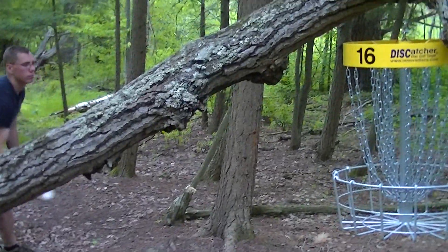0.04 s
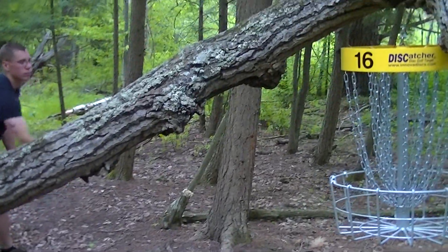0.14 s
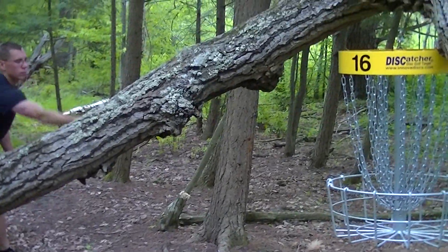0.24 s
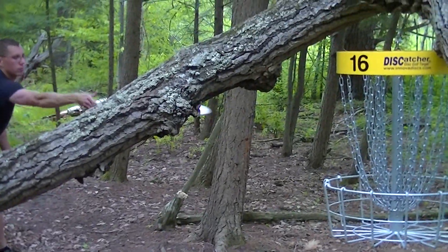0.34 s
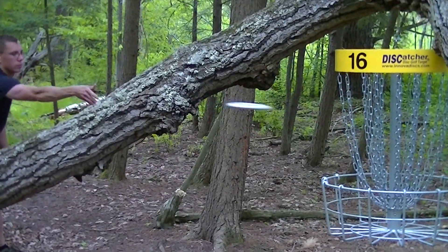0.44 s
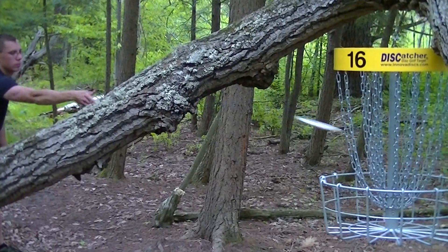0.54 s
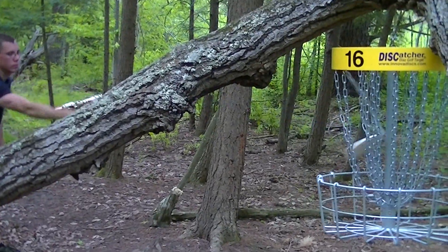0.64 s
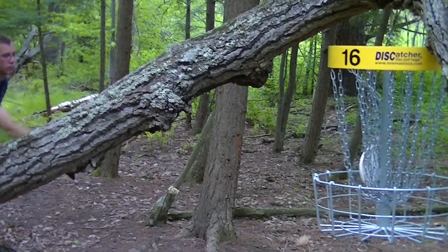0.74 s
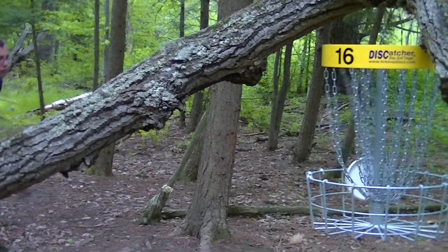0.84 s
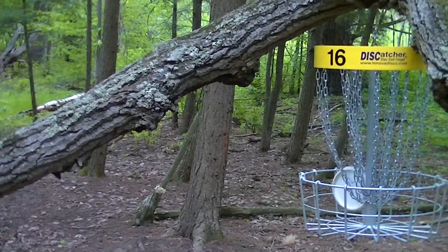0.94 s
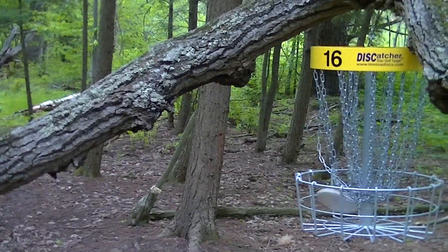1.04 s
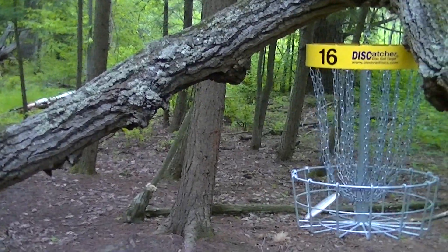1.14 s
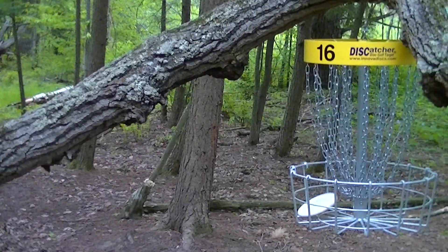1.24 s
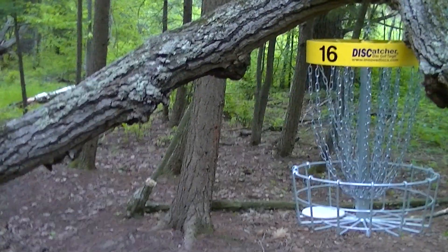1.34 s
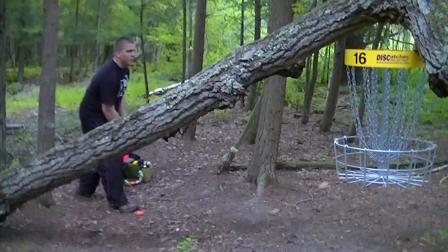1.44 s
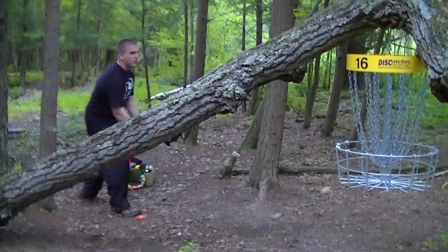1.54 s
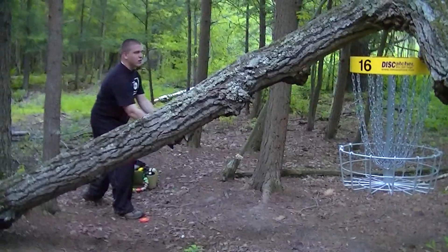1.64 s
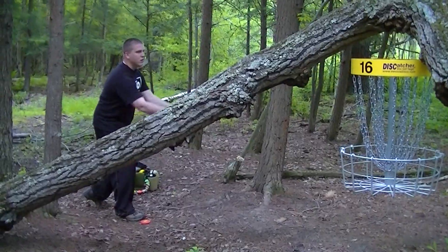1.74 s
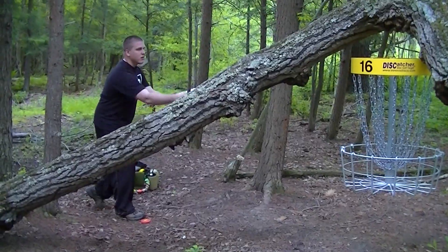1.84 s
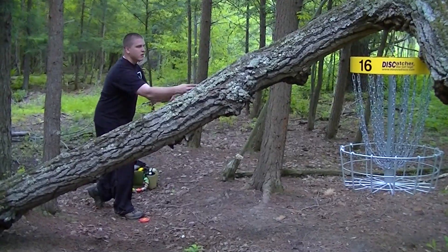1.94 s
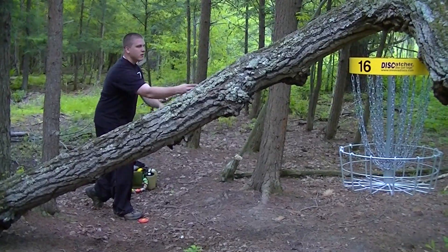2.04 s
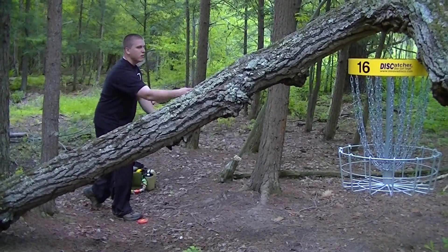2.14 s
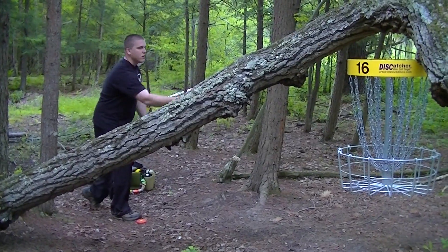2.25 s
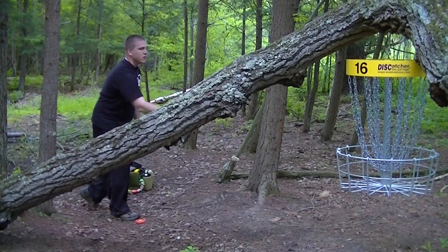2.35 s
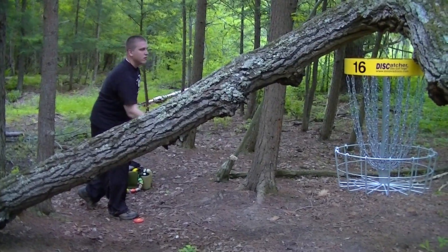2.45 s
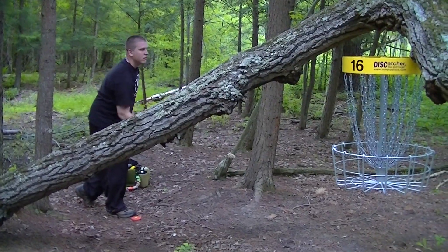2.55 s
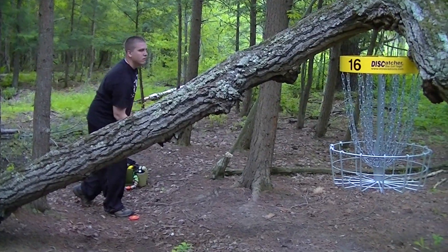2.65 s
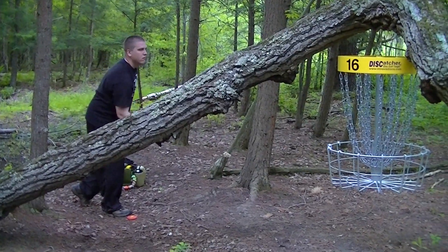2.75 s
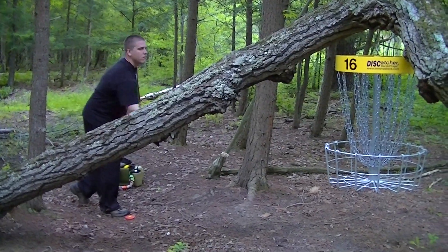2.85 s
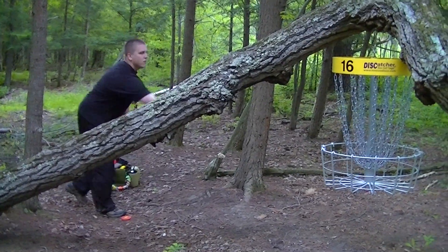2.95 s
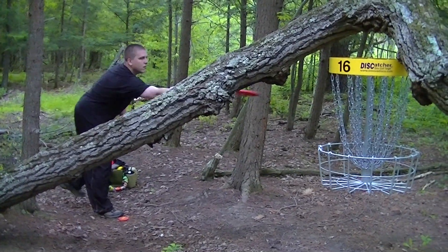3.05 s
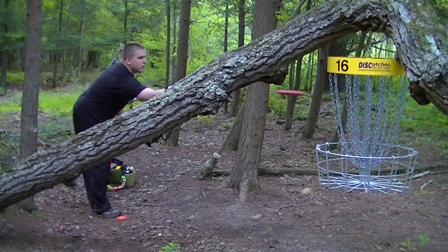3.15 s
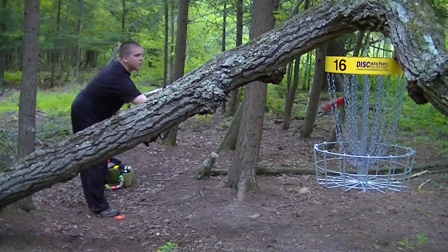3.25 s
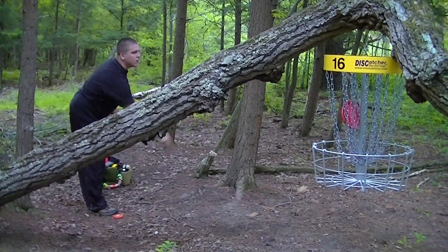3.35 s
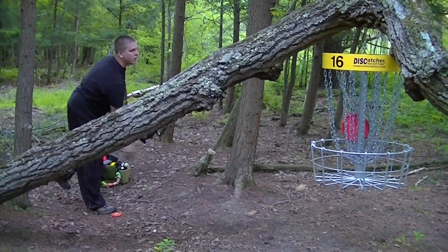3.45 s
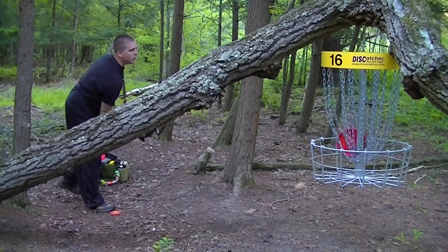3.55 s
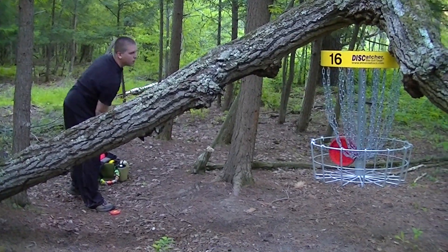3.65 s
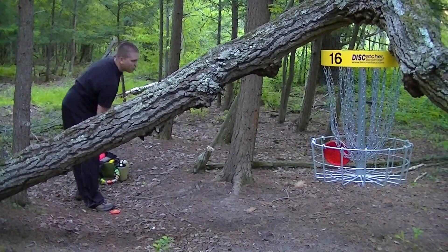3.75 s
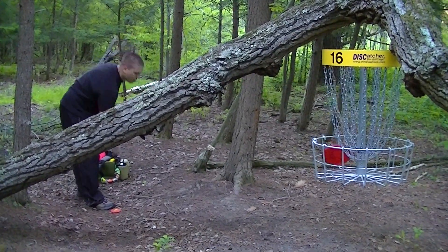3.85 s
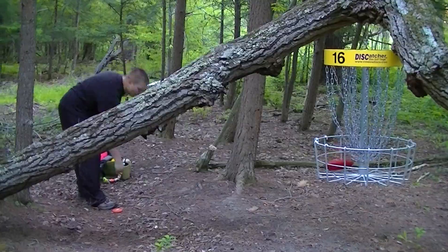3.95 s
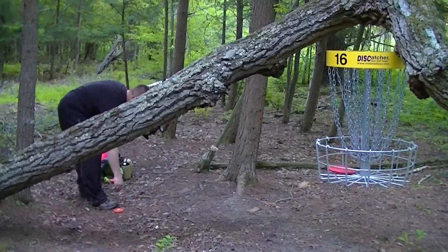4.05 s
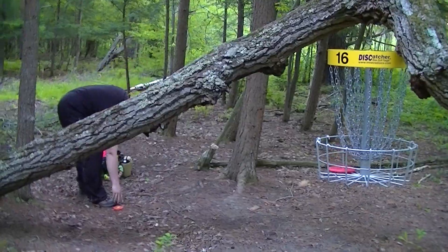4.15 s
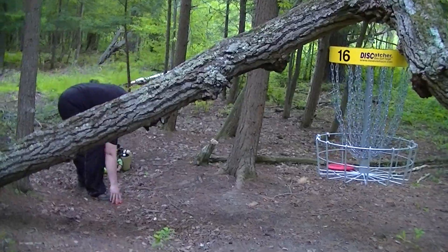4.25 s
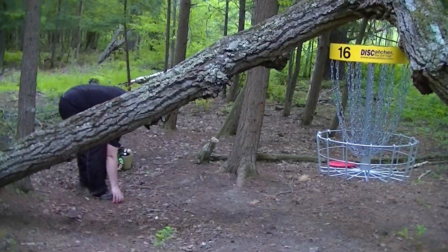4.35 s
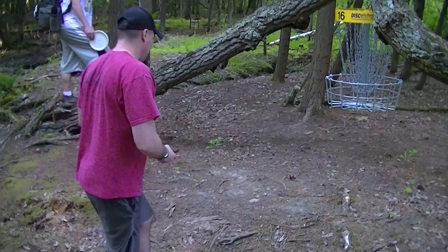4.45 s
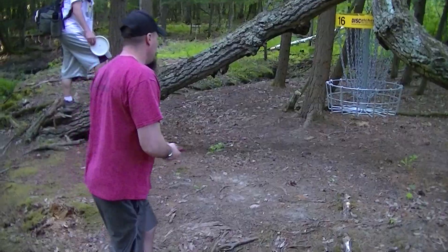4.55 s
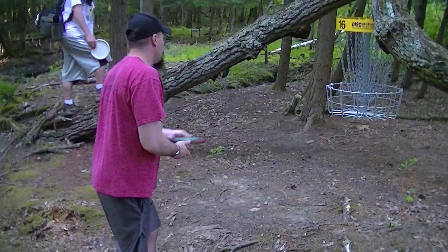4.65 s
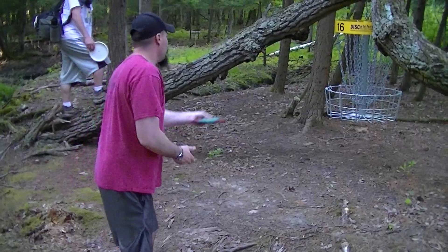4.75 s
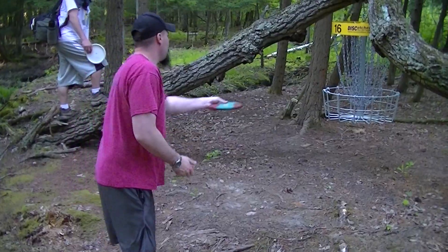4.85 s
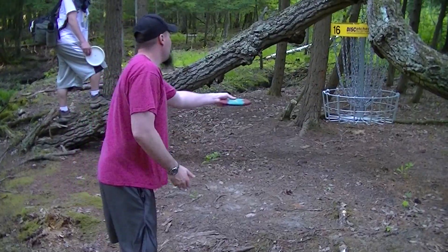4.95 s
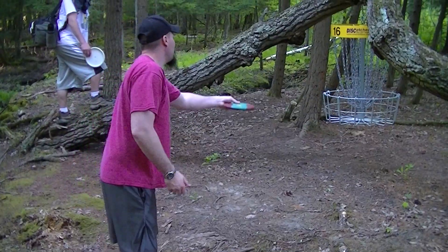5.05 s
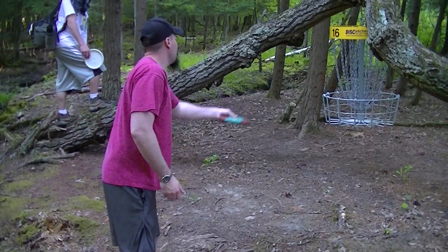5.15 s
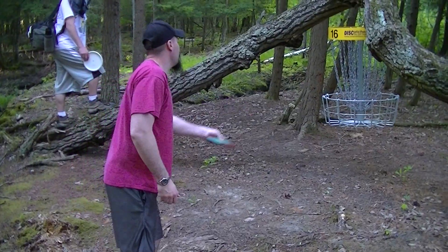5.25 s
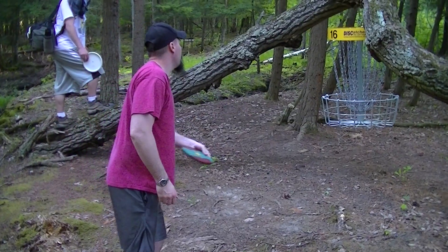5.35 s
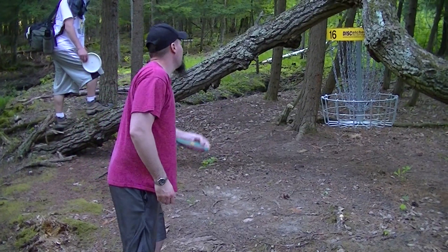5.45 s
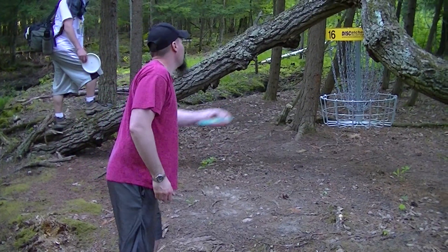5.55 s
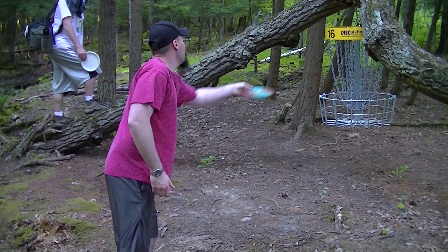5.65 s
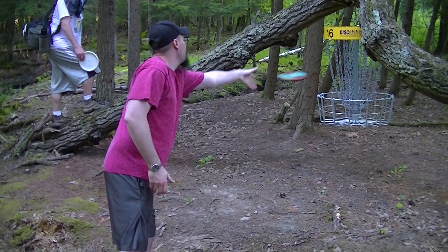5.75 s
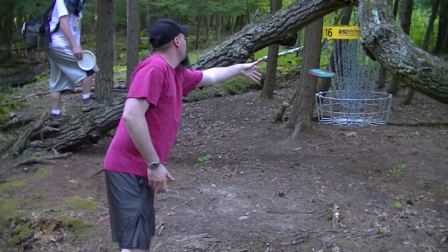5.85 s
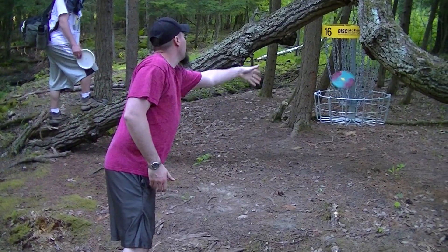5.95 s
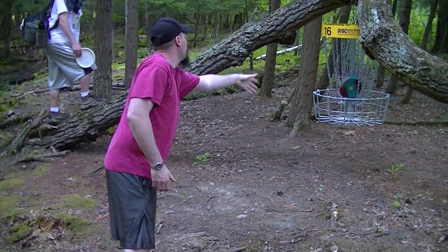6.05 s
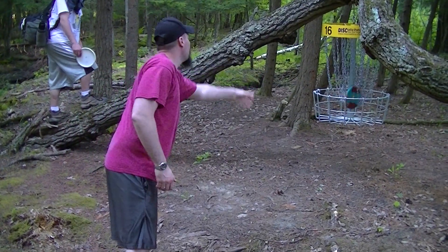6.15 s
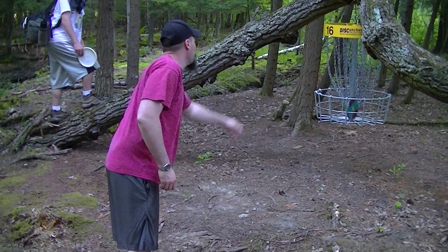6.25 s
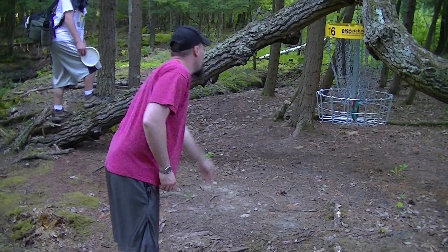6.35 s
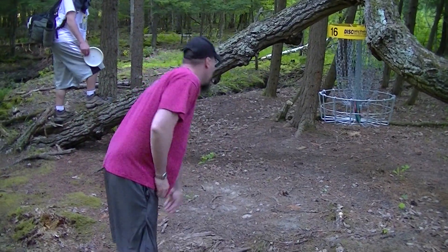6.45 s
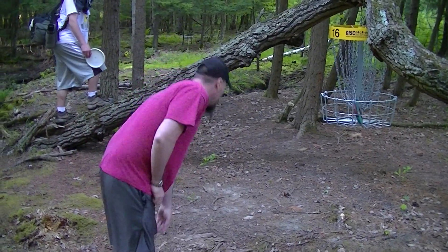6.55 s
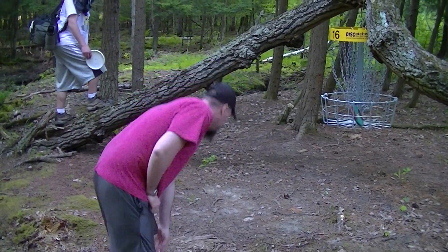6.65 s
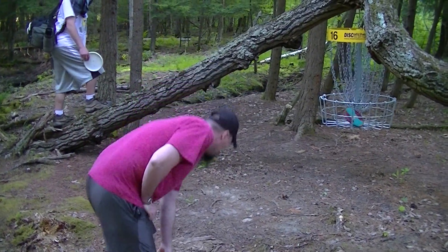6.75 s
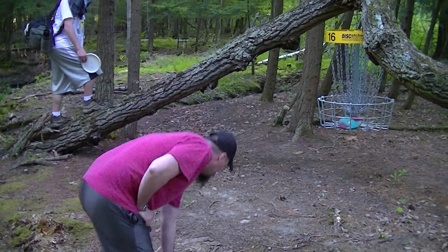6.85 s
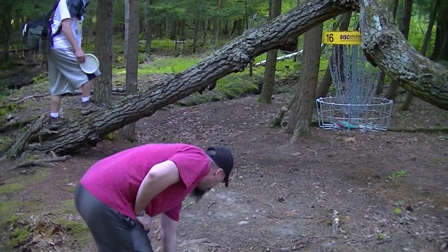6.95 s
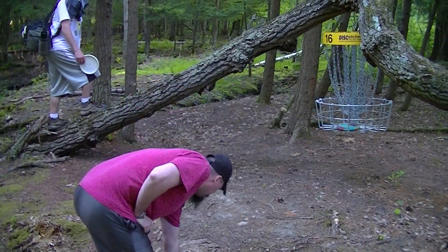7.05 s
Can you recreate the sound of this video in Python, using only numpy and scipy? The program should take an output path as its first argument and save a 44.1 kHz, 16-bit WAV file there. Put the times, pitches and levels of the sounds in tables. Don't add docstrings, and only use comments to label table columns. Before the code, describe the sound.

Three disc throws into a chain basket outdoors among trees. Each impact is a sudden bright burst of clashing links, dense metallic rattle and dull plastic knocks, thinning into single high clinks. Two abrupt scene changes chop the ringing short. Between throws, twigs snap, dry leaves tick, feet thud softly and cloth swishes, with faint lens-motor ticking. A small handheld camera hears it close and almost mono, over a low, airy forest hum.

```python
import sys
import numpy as np
from scipy import signal
from scipy.fft import rfft, irfft, next_fast_len
from scipy.io import wavfile
from scipy.ndimage import uniform_filter1d

SR = 44100
rng = np.random.default_rng(int(sys.argv[2]) if len(sys.argv) > 2 else 0)


def rack_gain(trim_db):
    fader = np.asarray(trim_db, float)
    return 10 ** (fader / 20)


def transcribe(signal):
    frames = np.atleast_2d(signal).T
    limited = np.clip(frames, -1, 1)
    pcm = np.round(limited * 32767).astype(np.int16)
    wavfile.write(sys.argv[1], SR, pcm)


N = 313065


def rms_one(x):
    return x / np.sqrt(np.mean(x ** 2) + 1e-20)


def at_hz(points, hz):
    point_hz, point_db = np.array(points).T
    return np.interp(np.log(hz), np.log(point_hz), point_db)


def coloured(x, points):
    size = next_fast_len(N)
    hz = np.maximum(np.arange(size // 2 + 1) * SR / size, 1)
    return rms_one(irfft(rfft(x, size) * rack_gain(at_hz(points, hz)), size)[:N])


def band(x, low_hz, high_hz):
    sos = signal.butter(2, [low_hz, min(high_hz, .45 * SR)], "band", fs=SR, output="sos")
    return signal.sosfilt(sos, x)


def ring(clicks, hz, t60):
    r = rack_gain(-60 / (t60 * SR))
    w = 2 * np.pi * hz / SR
    return signal.lfilter([0, np.sin(w)], [1, -2 * r * np.cos(w), r * r], clicks + 1e-18)


def grains(per_s, uneven_db):
    sizes = rack_gain(uneven_db * np.minimum(rng.exponential(1, N), 5)) * rng.choice([-1, 1], N)
    return rms_one(sizes * (rng.random(N) < per_s / SR))


def add(track, s, burst):
    at = round(s * SR)
    track[at:at + len(burst)] += burst[:N - at]


def dying(t60):
    return rack_gain(-60 * np.arange(int(t60 * SR) + 2) / (t60 * SR))


def snap(hz, width, t60, level_db, solid=0):
    fall = dying(t60)
    burst = rng.standard_normal(9000)[:len(fall)] * fall[:9000]
    burst = np.r_[solid, burst, np.zeros(200)]
    burst = band(burst, hz / width, hz * width)
    burst = band(burst, hz / width / 1.3, hz * width * 1.3)
    return rack_gain(level_db) * burst / np.abs(burst).max()


CUTS_S = [1.44, 4.447]
# hum_db, hum_fall_db_per_s, bright_swish_db, dull_swish_db, settling_s
VIEWS = [
    (-50, 4, -63, -61.5, 0.7),
    (-54, -2, -52, -46, 2.27),
    (-54, 0.5, -51, -50.5, 0.55),
]


def by_view():
    t, starts = np.arange(N) / SR, np.r_[0, CUTS_S]
    view = np.searchsorted(starts, t, "right") - 1
    return t - starts[view], *np.array(VIEWS)[view].T


# pitch_hz, level_db per Hz
WOOD_COLOUR = [(12, -33.5), (20, 3.5), (81, 2), (520, 7), (897, 3), (2500, -4.5), (4300, -5),
               (16000, -22.5)]
# pitch_hz, likeness 0 to 1
LIKENESS = [(25, .15), (60, .45), (125, 0.58), (300, 0.86), (1000, 0.85), (16000, 0.7)]


def wood():
    size = next_fast_len(N)
    hz = np.maximum(np.arange(size // 2 + 1) * SR / size, 1)
    alike = np.clip(at_hz(LIKENESS, hz), 0, 1)
    mid, side = (coloured(rng.standard_normal(N), WOOD_COLOUR) for _ in range(2))
    side = irfft(rfft(side, size) * np.sqrt((1 - alike) / (1 + alike)), size)[:N]
    since, hum_db, fall_db_per_s, *_ = by_view()
    hum = rack_gain(np.maximum(hum_db - fall_db_per_s * since, -57))
    return hum * np.array([mid + side, mid - side])


# pitch_hz, level_db
CLOTH_COLOUR = [(1500, -24.5), (2500, -6.5), (5000, 0), (8000, 7), (11000, 1.5), (13500, -2.5),
                (16000, -10)]
# start_s, peak_s, end_s, bright_db, dull_db
SWEEPS = [(1.643, 1.826, 2.05, -37.5, -73), (2.427, 2.443, 2.54, -48, -41.5),
          (4.5, 4.578, 4.64, -38.5, -35), (4.957, 4.95, 5.32, -57.5, -83), (5.455, 5.476, 5.54, -55.5, -48),
          (5.566, 5.625, 5.9, -56, -77)]


def swish():
    since, _, _, bright_db, dull_db, settle_s = by_view()
    left = np.clip(1 - since / settle_s, 0, 1)
    rest_bright_db, rest_dull_db = -65.5, -64
    bright = rack_gain(rest_bright_db + left * (bright_db - rest_bright_db))
    dull = rack_gain(rest_dull_db + left * (dull_db - rest_dull_db))
    for start, peak, end, bright_db, dull_db in SWEEPS:
        phase = np.interp(np.arange(N) / SR, [start, peak, end], [0, np.pi / 2, np.pi])
        swell = np.sin(phase) ** 3.3
        bright = bright + rack_gain(bright_db) * swell
        dull = dull + rack_gain(dull_db) * swell
    cloth = coloured(grains(16000, uneven_db=4.5), CLOTH_COLOUR)
    litter = rms_one(band(grains(6200, uneven_db=5.0), 830, 3740))
    return rack_gain(1.0) * bright * cloth + rack_gain(-8.5) * dull * litter


# start_s, peak_db, pitch_hz
TWIGS = [(0.1652, -30.5, 1800), (0.4735, -29.5, 4700), (1.4945, -18, 1660), (1.514, -20.5, 8100),
         (1.584, -7.5, 2870), (1.6082, -18, 1740), (1.66, -25.5, 2540), (1.99, -19.5, 10400),
         (2.0377, -0.5, 1520), (1.558, -26, 6050), (1.678, -27, 2530), (4.7207, -27, 6560),
         (5.2792, -34.5, 8000), (2.2979, -21.5, 2000), (2.4443, -23.5, 8010), (3.049, -20, 1470),
         (4.481, -20, 8380), (4.495, -20.5, 2220), (4.6636, -29.5, 2550), (5.3602, -23, 4430),
         (5.471, -24.5, 2200), (5.5083, -26, 3830), (5.7894, -23, 3070)]
# start_s, peak_db
LEAVES = [(2.045, -24), (2.0785, -23), (2.1257, -27), (2.28, -31), (2.375, -26), (2.419, -27), (2.571, -35),
          (4.632, -36), (4.702, -33), (4.778, -36), (4.965, -37), (5.091, -36.5), (5.045, -31),
          (5.2413, -32.5), (5.406, -38.5), (5.6191, -34), (5.7648, -44.5), (5.85, -34)]
# start_s, peak_db, pitch_hz
STEPS = [(1.494, -39.5, 760), (1.607, -41, 880), (1.942, -45.5, 980), (2.036, -33.5, 534),
         (2.2, -49.5, 207), (2.297, -43, 840), (2.455, -42.5, 630), (3.049, -50, 1040), (4.576, -41.5, 284),
         (4.649, -41.5, 295), (2.038, -22.5, 1620)]


def underfoot():
    out = np.zeros(N)
    for s, level_db, hz in TWIGS:
        add(out, s, snap(hz, width=1.63, t60=0.024, level_db=level_db - 7.5, solid=10.8))
        add(out, s, snap(4500, width=2.3, t60=0.013, level_db=level_db - 12.0))
    for s, level_db in LEAVES:
        leaf_hz = 9900 + 142 * (level_db + 15.0)
        add(out, s, snap(leaf_hz, width=1.32, t60=0.0028, level_db=level_db - 2.5))
    for s, level_db, hz in STEPS:
        add(out, s, snap(hz, width=1.15, t60=0.1, level_db=level_db - 0.5))
        add(out, s, snap(330, width=1.74, t60=0.035, level_db=level_db + 3.5))
    return out


def trunks(x, level_db, t60):
    length = int(.6 * SR)
    fall = dying(t60 + 0.8)[:length] ** ((t60 + 0.5) / t60)
    tail = band(rng.standard_normal(length) * fall, 250, 9000)
    tail = np.r_[np.zeros(500), tail]
    return rack_gain(level_db) * signal.fftconvolve(x, tail / np.sqrt(np.sum(tail ** 2)))[:N]


# time_s, level_db
SWING = [
    [(.62, -24.5), (.8, -13), (.95, -23.5), (1.12, -29), (1.22, -21.5), (1.3, -37.5), (1.44, -30.5)],
    [(3.27, -16.5), (3.46, -15), (3.7, -22), (3.85, -21.5), (3.93, -33), (4.1, -33), (4.3, -30.5),
     (4.44, -43.5)],
    [(5.98, -17.5), (6.15, -22.5), (6.27, -27), (6.45, -25), (6.6, -39.5), (6.72, -43), (6.92, -54.5),
     (7.09, -39.5)],
]


def gains_in_time(level_db, share):
    rows = [[(throw[0][0] - .004, -99), *throw, (throw[-1][0] + .019, -99)] for throw in SWING]
    swing_db = np.interp(np.arange(N) / SR, *np.vstack(rows).T)
    return rack_gain(level_db + share * (swing_db + 20)) * (swing_db > -70)


def links(families, jangle, clash_s, clash_db, jangle_db, clash_lift_db, damping, run_s, count,
          scatter=1, touches=3):
    out = np.zeros(N)
    few = np.clip((clash_db - clash_db.max()) / 35 * scatter + 1, .3, 1)[:, None]
    for hz, spread_hz, level_db, t60 in families:
        favour_db = scatter * rng.normal(0, 2.92, (len(clash_s), 1))
        for offset in np.linspace(-1.3, 1.3, count) + rng.normal(0, 0.13, count):
            at = rng.integers(0, N, 800)
            small_db = jangle_db + 2.84 * np.minimum(rng.exponential(1, 800), 4)
            small = jangle[at] * rack_gain(small_db) * rng.choice([-1, 1], 800)
            late = run_s * rng.exponential(1, (len(clash_s), touches))
            late[:, 0] *= .15
            share_db = rng.normal(0, 5.27, late.shape)
            mean_power = np.mean(rack_gain(share_db) ** 2, axis=1, keepdims=True)
            share_db -= (1 - scatter) * 10 * np.log10(mean_power)
            hard = rack_gain(clash_db[:, None] + clash_lift_db + share_db + favour_db)
            hard *= rng.choice([-1, 1], late.shape)
            hard *= (rng.random((len(clash_s), 1)) < few) / np.sqrt(few)
            when = np.minimum(((clash_s[:, None] + late) * SR).astype(int), N - 1)
            clicks = np.bincount(np.r_[at, when.ravel()], np.r_[small, hard.ravel()], N)
            link_gain = rack_gain(level_db - 1.74 * offset ** 2)
            out += link_gain * ring(clicks, hz + offset * spread_hz, t60 * damping)
    return out


# start_s, ring_peak_db, rattle_db
CLASH_1 = [(0.6128, -2, -5), (0.6508, 1, -14), (0.68, 0.5, -31), (0.709, -1, -13.5), (0.736, -3, -36),
           (0.7873, -1, -33), (0.827, -12, -23), (0.8673, -1.5, -14.5), (0.9, -2.5, -33), (1.0197, -4, -21),
           (1.06, -11, -14), (1.149, -4, -30), (1.1787, -7.5, -25.5), (1.3267, -19, -48), (1.348, -16, -37)]
CLASH_2 = [(3.264, 2, -6), (3.3109, 1, -15), (3.333, 5.5, -35), (3.384, 2.5, -13.5), (3.4923, -7, -20),
           (3.526, -6, -40), (3.5604, -9, -15.5), (3.5878, -6, -24), (3.6366, -2, -17), (3.671, -2, -13.5),
           (3.724, -9, -27), (3.7559, -13, -17), (3.822, -24, -20), (3.9513, -12.5, -32), (3.98, -5.5, -30),
           (4.0026, -18, -47), (4.061, -32, -27.5), (4.1266, -18, -60), (4.1778, -18, -31.5),
           (4.2062, -25, -64), (4.277, -20, -60), (4.395, -40, -48), (4.436, -27.5, -35)]
CLASH_3 = [(5.9719, 2, -8.5), (6.0188, -0.5, -14), (6.0498, 3.5, -21), (6.0716, 3.5, -38),
           (6.1112, 0, -19.5), (6.1516, 0, -27), (6.1912, -0.5, -16), (6.331, -28, -22.5),
           (6.3993, -4, -14.5), (6.4665, -9, -20.5), (6.624, -16, -27.5), (6.657, -12.5, -27.5),
           (6.7286, -13, -39), (6.757, -15, -37), (6.8094, -18, -35), (6.8677, -24, -42),
           (6.9475, -20.5, -34.5), (6.968, -20, -31.5), (6.9915, -12.5, -25.5), (7.0808, -17, -45)]
# pitch_hz, spread_hz, level_db, t60_s
HIGH_RING = [(11300, 50, -9, .15), (11660, 55, -4, .22), (11960, 60, 0, .25), (12620, 70, -4, .22),
             (12980, 90, -12, .15), (13400, 60, -15, .18), (13700, 70, -16, .2), (14600, 150, -21, .15)]
# pitch_hz, spread_hz, level_db, t60_s
SIDE_RING = [(5200, 70, -3, .15), (5620, 90, -4, .15), (6490, 40, -1, .18), (7100, 90, -5, .15),
             (7840, 45, 0, .22), (8450, 150, -2, .12), (9960, 40, -3, .2), (10800, 70, -2, .18)]


def clashes():
    s, high_db, side_db = np.transpose(CLASH_1 + CLASH_2 + CLASH_3)
    high = gains_in_time(level_db=-19.0, share=1.0)
    side = gains_in_time(level_db=-27, share=1.0)
    out = links(HIGH_RING, high, s, high_db, jangle_db=-16.5, clash_lift_db=-27.0,
                damping=0.6, run_s=.012, count=8)
    out += links(SIDE_RING, side, s, side_db, jangle_db=-17.5, clash_lift_db=-26.5,
                 damping=0.31, run_s=0.0095, count=5)
    for at, level_db in zip(s, high_db):
        add(out, at, snap(9500, width=1.9, t60=.003, level_db=level_db - 13, solid=8))
    return out


# pitch_hz, level_db
RATTLE_COLOUR = [(1300, -28.5), (2200, -15.5), (4000, -5.5), (5000, 1), (7000, -3.5), (10500, -3.5),
                 (12500, -3), (16000, -14.5)]


def rattle():
    size, knots = next_fast_len(N), np.arange(0, N + SR, int(.045 * SR))
    shares = rng.random((3, len(knots))) ** 2
    out = np.zeros(N)
    for share in shares / np.sqrt(np.sum(shares ** 2, axis=0)):
        fine = rng.standard_normal(size // 2 + 1)
        for _ in range(2):
            fine = uniform_filter1d(fine, int(40.0 * size / SR))
        touched = rfft(grains(4000, uneven_db=2.5), size) * rack_gain(4.5 * rms_one(fine))
        touched = irfft(touched, size)[:N]
        out += np.interp(np.arange(N), knots, share) * rms_one(touched)
    loudness = rack_gain(-5.5) * gains_in_time(level_db=-27, share=1.0)
    swell = dying(.12)
    swell = swell * np.minimum(np.arange(len(swell)) / 90, 1)
    for s, _, rattle_db in CLASH_1 + CLASH_2 + CLASH_3:
        add(loudness, s, rack_gain(rattle_db - 2.0) * swell)
    return loudness * coloured(out, RATTLE_COLOUR)


# start_s, peak_db
POLE_1 = [(0.619, -14), (0.6705, -16), (0.7, -3), (0.741, -7.5), (0.8017, -13), (0.8642, -10), (0.927, -17),
          (1.0204, -23), (1.049, -15), (1.109, -19), (1.1975, -17.5)]
POLE_2 = [(3.265, -17.5), (3.309, -4.5), (3.3856, -12), (3.4098, -6), (3.4799, -5), (3.5481, -9),
          (3.621, -16), (3.654, -9.5), (3.7246, -9.5), (3.8045, -11), (3.9757, -23), (4.056, -21.5),
          (4.1867, -24.5)]
POLE_3 = [(5.975, -10), (6.0139, -11.5), (6.046, -16.5), (6.102, -5.5), (6.1364, -16), (6.1934, -9),
          (6.2935, -22), (6.3346, -22), (6.402, -6), (6.467, -26), (6.6264, -17.5), (6.9896, -17)]
# pitch_hz, spread_hz, level_db, t60_s
LOW_RING = [
    (4516, 9, 0, .22),
    (4610, 45, -5, .1),
    (5150, 420, -10, .06),
]


def pole_hits():
    t, thrown = np.arange(N) / SR, np.array([throw[0][0] for throw in SWING])
    latest = thrown[np.maximum(np.searchsorted(thrown, t) - 1, 0)]
    reach = np.clip((t - latest) / 0.19, .35, 1)
    low = reach * gains_in_time(level_db=-30.5, share=1.33)
    s, pole_db = np.transpose(POLE_1 + POLE_2 + POLE_3)
    clear = links(LOW_RING[:1], low, s, 1.39 * pole_db, jangle_db=-8.0, clash_lift_db=-12.0,
                  damping=0.66, run_s=.004, count=7, scatter=0.14)
    chink = links(LOW_RING[1:], low, s, pole_db, jangle_db=-5.5, clash_lift_db=-12.0,
                  damping=0.74, run_s=.003, count=7, scatter=0.11)
    return band(clear + chink, 4040, 5500)


# start_s, peak_db
BROADSIDE = [(.642, -17), (.787, -38), (1.178, -20.5), (3.266, -29), (3.311, -21), (4.03, -33.5),
             (4.112, -34), (4.148, -36), (4.437, -31.5), (6.019, -19), (6.152, -32), (6.62, -32),
             (6.83, -40.5)]
# pitch_hz, spread_hz, level_db, t60_s
MID_RING = [(9240, 130, 0, .12)]


def broadside_slaps():
    side = gains_in_time(level_db=-27, share=1.0)
    return links(MID_RING, side, *np.transpose(BROADSIDE), jangle_db=-9.0, clash_lift_db=-7.0,
                 damping=0.38, run_s=0.009, count=9)


# start_s, peak_db, pitch_hz
CLINK_1 = [(0.663, -12, 11740), (0.682, -12, 12020), (0.709, -16, 11630), (0.713, -15, 12620),
           (0.738, -17, 12020), (0.808, -16.5, 12660), (0.809, -19, 11900), (0.825, -8, 11840),
           (0.829, -13, 9220), (0.862, -13.5, 7840), (0.866, -11, 11750), (0.885, -14, 12620),
           (0.883, -13, 11400), (0.96, -34, 11970), (0.975, -30.5, 12620), (0.982, -32, 11630),
           (0.981, -28, 11970), (0.982, -13.5, 8970), (1.026, -14, 9100), (1.027, -16, 11670),
           (1.045, -16, 11850), (1.062, -16, 11280), (1.077, -14, 12400), (1.084, -15, 11360),
           (1.137, -17, 12400), (1.157, -24.5, 12020), (1.187, -13, 11570), (1.186, -16, 11840),
           (1.233, -22, 11970), (0.474, -49, 4500), (1.326, -28, 11930), (1.355, -31, 12660),
           (1.363, -22, 11600), (1.376, -20, 11280), (0.925, -23, 7400)]
CLINK_2 = [(3.299, -9, 9100), (3.389, -21, 6500), (3.408, -24, 9220), (3.426, -14.5, 11970),
           (3.499, -11.5, 9200), (3.503, -12, 11900), (3.525, -11, 9200), (3.562, -10, 11930),
           (3.613, -7.5, 9220), (3.685, -12, 11670), (3.705, -21, 11860), (3.737, -23, 13800),
           (3.777, -22.5, 12300), (3.854, -29, 11800), (3.655, -20, 7940), (3.913, -39, 12620),
           (3.966, -22, 12660), (4.006, -28, 12660), (4.007, -17, 11970), (4.062, -27, 12000),
           (3.826, -29, 7150), (4.125, -28, 12000), (4.179, -26, 11400), (4.179, -27, 11640),
           (4.21, -25, 12020), (4.234, -35, 11930), (4.235, -28, 12660), (4.249, -24.5, 9420),
           (4.276, -31, 12500), (4.289, -30, 11670), (4.3, -24.5, 9300), (4.354, -28.5, 9260),
           (4.378, -37, 11900), (4.395, -34, 12200), (4.438, -22, 9250)]
CLINK_3 = [(6.023, -18, 11970), (6.041, -14, 9260), (6.042, -25, 14640), (6.073, -6, 11800),
           (6.125, -10, 11760), (6.152, -11, 11840), (6.224, -19, 12660), (6.25, -20, 11930),
           (6.298, -32, 9200), (6.329, -19.5, 11700), (6.331, -35, 9500), (6.364, -25, 9300),
           (6.409, -13, 9100), (6.419, -12, 11400), (6.433, -13, 11670), (6.472, -16, 11930),
           (6.488, -24, 12580), (6.586, -35, 9300), (6.104, -19, 7790), (6.656, -19.5, 9200),
           (6.666, -20, 12020), (6.758, -16.5, 12000), (6.762, -32, 12600), (6.82, -21.5, 12000),
           (6.824, -30, 12530), (6.868, -24.5, 11550), (6.876, -33, 12660), (6.948, -32, 12580),
           (6.952, -40, 7300), (6.969, -35, 9300), (7, -29, 11670), (7.023, -25, 11930),
           (7.061, -31, 11930), (7.08, -24, 12620)]


def clinks():
    t60_s, rise_s, beat_hz = 0.14, 0.0019, 30
    out = np.zeros(N)
    for s, level_db, hz in CLINK_1 + CLINK_2 + CLINK_3:
        fall = dying(t60_s * (.55 if 8000 < hz < 10000 else 1))
        t = np.arange(len(fall)) / SR
        twin, split, turn = rng.random(3)
        twin_hz = hz + beat_hz * (4 * split - 2)
        pair = np.sin(2 * np.pi * hz * t) + 0.7 * twin * np.sin(2 * np.pi * (twin_hz * t + turn))
        add(out, s - rise_s, rack_gain(level_db + 0.5) * pair * fall * (1 - np.exp(-t / rise_s)))
    return out


def chains():
    tuned = clashes() + pole_hits() + broadside_slaps() + clinks()
    return band(tuned, 1500, 19000) + rattle()


# start_s, peak_db, pitch_hz
KNOCK_1 = [(0.613, -8.5, 1880), (0.662, -12, 1530), (0.703, -15, 1360), (0.753, -19.5, 680),
           (0.79, -17.5, 970), (0.715, -29, 1190), (0.852, -17.5, 1120), (0.948, -24.5, 855),
           (1.062, -13, 870), (1.19, -15.5, 1620), (1.332, -27, 890), (1.341, -24, 810),
           (1.381, -14.5, 1440)]
KNOCK_2 = [(3.261, -5.5, 1550), (3.321, -17, 1490), (3.342, -6.5, 1490), (3.456, -18.5, 790),
           (3.496, -28, 1540), (3.516, -24, 770), (3.54, -23, 1670), (3.562, -18.5, 990), (3.582, -13, 704),
           (3.64, -18.5, 786), (3.7438, -7.5, 1250), (3.9551, -5.5, 850), (4.037, -17.5, 820),
           (4.049, -15.5, 940), (4.16, -22, 834), (4.258, -13.5, 2860), (4.377, -18.5, 1960),
           (4.385, -21, 2980), (4.3966, -13.5, 2700)]
KNOCK_3 = [(5.973, -12, 1030), (6, -16, 1580), (6.017, -19, 1000), (6.033, -10.5, 960), (6.041, -13, 980),
           (6.057, -10.5, 1000), (6.093, -21.5, 1110), (6.151, -22.5, 1310), (6.296, -31, 860),
           (6.33, -22, 1390), (6.629, -27.5, 1550), (6.792, -30, 2920), (6.875, -33, 660),
           (6.922, -29, 925), (6.963, -23.5, 880)]
# pitch_hz, spread_hz, level_db, t60_s
BASKET_RING = [(346, 56, -9.5, 0.08), (704, 38, -8, 0.027), (825, 87, 1, 0.047), (1100, 29, -8.5, 0.031),
               (1337, 64, -5.5, 0.12), (1580, 40, 3, 0.064), (1880, 43, -2, 0.066), (2293, 62, -3.5, 0.043),
               (2843, 130, -1, 0.043), (3320, 56, -9.5, 0.076)]
# start_s, peak_db
WIRE_1 = [(0.6133, -20.5), (0.6357, -14.5), (0.6642, -24), (0.7525, -27), (0.7784, -18), (0.8283, -19.5),
          (0.8717, -25), (0.9261, -26), (1.0274, -39), (1.0613, -23), (1.188, -23)]
WIRE_2 = [(3.2618, -16.5), (3.2977, -26), (3.3257, -14.5), (3.3696, -21), (3.4569, -36.5), (3.4983, -24.5),
          (3.5402, -20.5), (3.5896, -12), (3.6674, -24), (3.7432, -14.5), (3.9547, -33), (4.0121, -37.5),
          (4.1184, -26), (4.1608, -28), (4.2575, -31)]
WIRE_3 = [(5.9728, -16), (6.0017, -19), (6.0327, -15.5), (6.0676, -27), (6.0955, -30), (6.1504, -36),
          (6.1983, -29), (6.2247, -43), (6.3305, -24.5), (6.3998, -36), (6.5041, -38), (6.6303, -31.5)]
# pitch_hz, spread_hz, level_db, t60_s
WIRE_RING = [
    (1582, 22, -0.5, 0.092),
    (740, 60, -4, 0.052),
]


def basket():
    tremble = gains_in_time(level_db=-35.5, share=0.32)
    s, knock_db, pitch = np.transpose(KNOCK_1 + KNOCK_2 + KNOCK_3)
    body_db = knock_db - 5.1 * np.log2(np.maximum(pitch / 1500, 1))
    out = links(BASKET_RING, tremble, s, body_db, jangle_db=-13, clash_lift_db=-31.0,
                damping=0.91, run_s=0.0037, count=4)
    out += links(WIRE_RING, tremble, *np.transpose(WIRE_1 + WIRE_2 + WIRE_3), jangle_db=-22.5,
                 clash_lift_db=-9.5, damping=0.8, run_s=.005, count=3, scatter=0.16)
    out += rack_gain(-5.5) * tremble * rms_one(band(grains(2900, uneven_db=3.5), 610, 3500))
    out = band(band(out, 130, 9000), 170, 12000)
    for at, level_db, hz in zip(s, knock_db, pitch):
        add(out, at, snap(hz, width=1.264, t60=0.015, level_db=level_db - 6, solid=8.3))
        snap_hz = max(hz, np.sqrt(1150 * hz))
        add(out, at, snap(snap_hz, width=2.31, t60=0.0058, level_db=level_db + 1.0, solid=12))
    return out


# start_s, peak_db, pitch_hz
THUMPS = [(1.061, -39, 147), (1.381, -36, 231), (3.579, -46, 167), (3.741, -40, 106), (3.95, -39, 98.1),
          (4.039, -28, 260), (4.157, -32, 300), (6.939, -37, 403), (1.327, -40, 149), (1.195, -37, 230),
          (4.0, -36, 435), (4.381, -44, 111), (6.332, -35, 268)]


def thumps():
    out = np.zeros(N)
    for s, level_db, hz in THUMPS:
        add(out, s, snap(hz, width=2.26, t60=0.28, level_db=level_db))
    return out


# first_tick_s, end_s, peak_db
LENS = [
    (1.894, 3.19, -48),
    (5.251, 5.97, -47),
]


def lens_motor():
    out, t = np.zeros(N), np.arange(300) / SR
    blip = np.hanning(len(t)) * np.sin(2 * np.pi * 3800 * t)
    for first, end, level_db in LENS:
        for s in np.arange(first, end, 1 / 29.97):
            add(out, s - .003, rack_gain(level_db + rng.normal(0, 1.1)) * blip)
    return out


def bird():
    start_s, length_s, level_db, pitch_hz, drop_hz = 6.72, .19, -48, 3290, 160
    out, t = np.zeros(N), np.arange(int(length_s * SR)) / SR
    hz = pitch_hz + drop_hz * np.exp(-(t / 0.031) ** 2)
    note = np.sqrt(np.hanning(len(t))) * np.sin(2 * np.pi * np.cumsum(hz) / SR)
    add(out, start_s, rack_gain(level_db) * note)
    return out


# pitch_hz, side_db against mid
SIDE_COLOUR = [(100, -16), (400, -47.5), (1900, -25.5), (4000, -31), (8000, -27), (13000, -27.5)]


def ports(near, ground):
    taps = np.exp(2j * np.pi * rng.random(257)) * rack_gain(at_hz(SIDE_COLOUR, np.linspace(1, SR / 2, 257)))
    side = signal.fftconvolve(near, irfft(taps))[:N] + rack_gain(-21) * ground
    return np.array([near + side, near - side])


def scene():
    t = np.arange(N) / SR
    near = chains() + basket() + thumps()
    near = near + trunks(near, level_db=-12.5, t60=0.24)
    for cut_s in CUTS_S:
        near = near * ((t < cut_s) | (t > cut_s + .8))
    ground = underfoot()
    near = near + ground + trunks(ground, level_db=-18.5, t60=0.26)
    near = near + swish() + lens_motor() + bird()
    return ports(near, ground) + wood()


def band_limit(x):
    return signal.sosfilt(signal.butter(12, 16430, fs=SR, output="sos"), x)


def record(dry):
    x = np.tanh(dry / 1.4) * 1.4
    x = signal.sosfilt(signal.cheby2(14, 45, 16150, fs=SR, output="sos"), x)
    mix = np.clip(x, -1, 1)
    return band_limit(mix)


dry = scene()
out = record(dry)
transcribe(out)
```